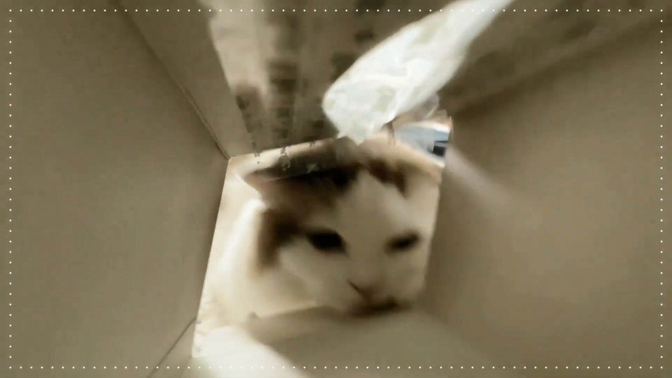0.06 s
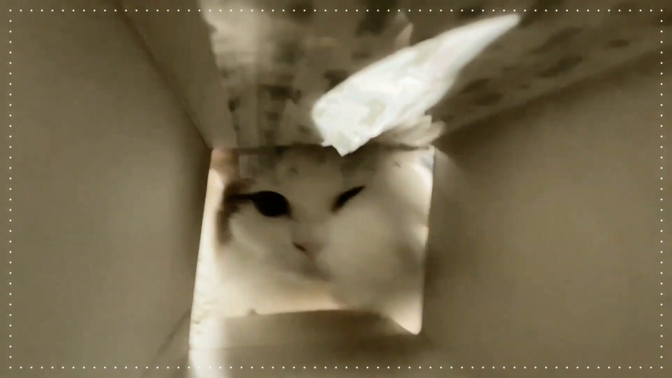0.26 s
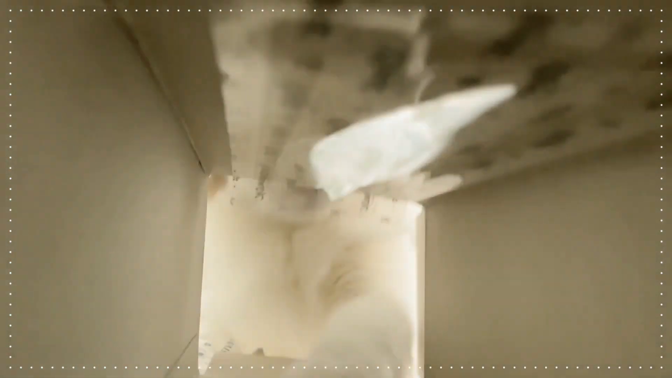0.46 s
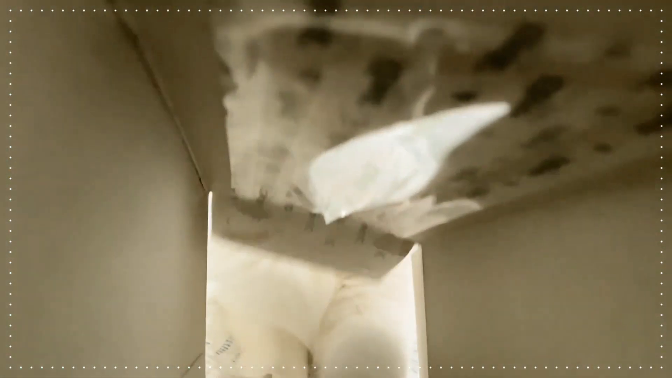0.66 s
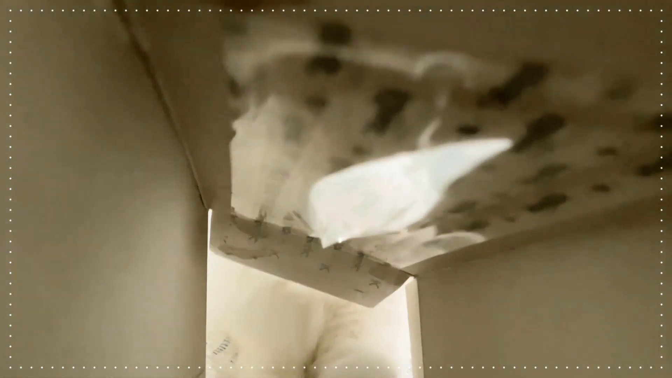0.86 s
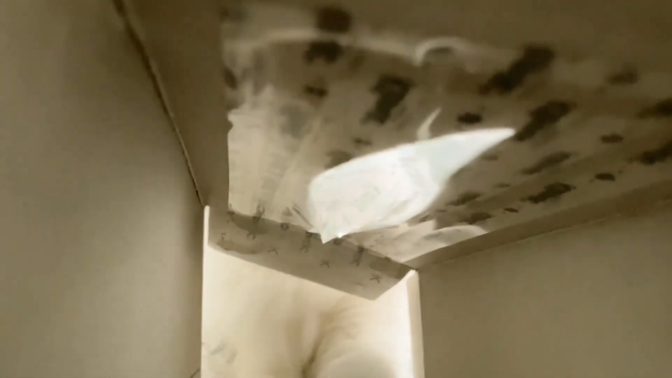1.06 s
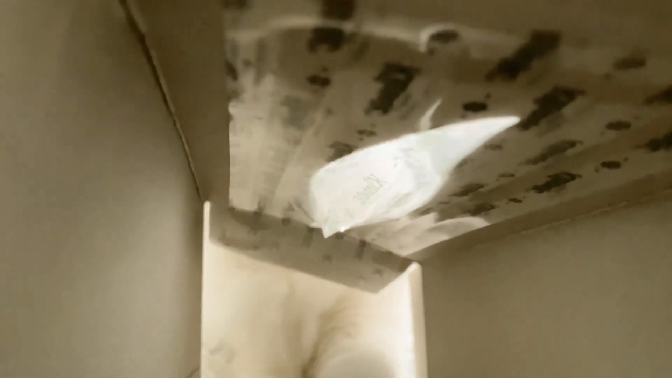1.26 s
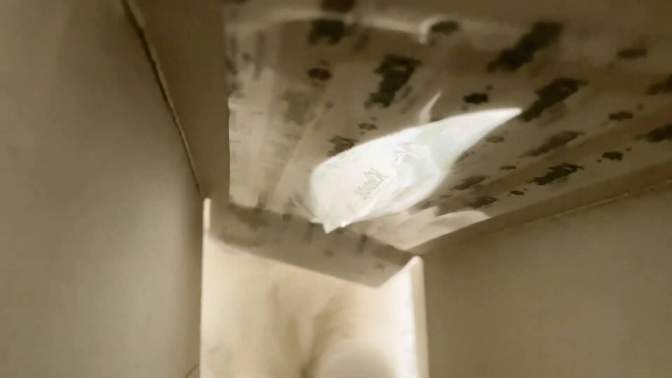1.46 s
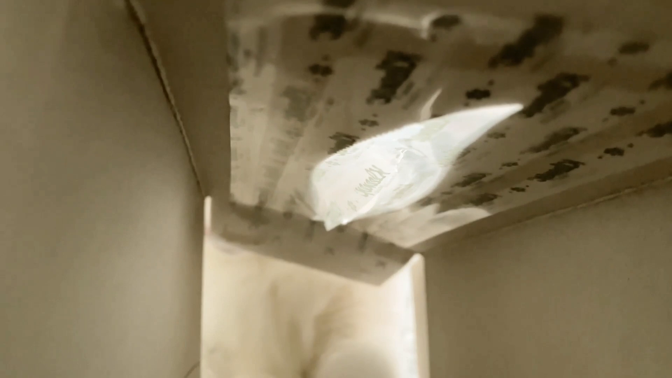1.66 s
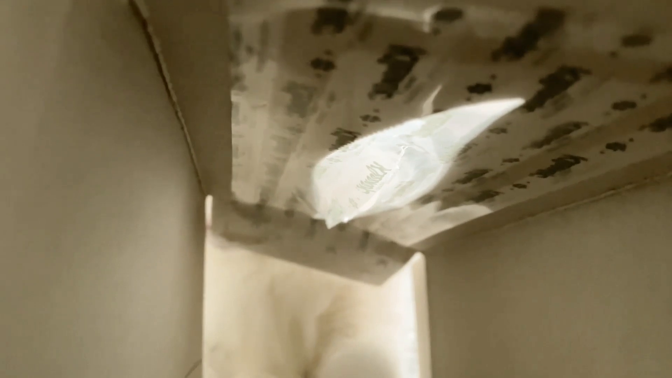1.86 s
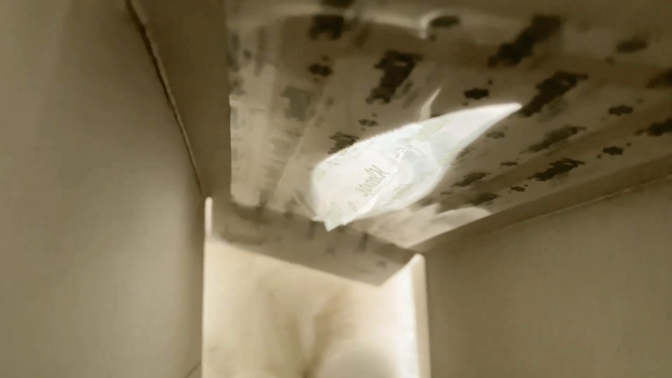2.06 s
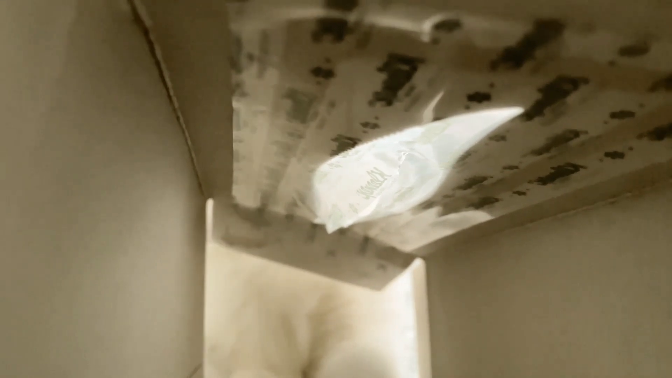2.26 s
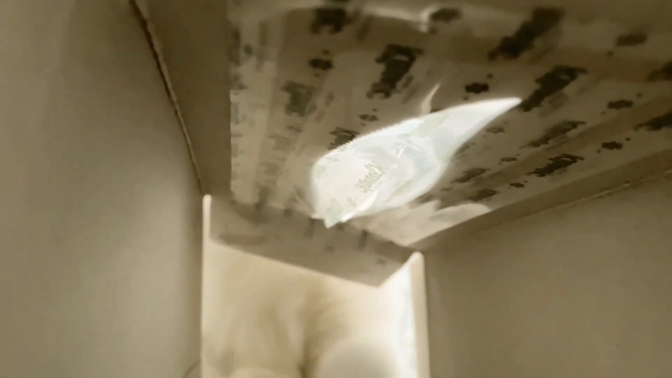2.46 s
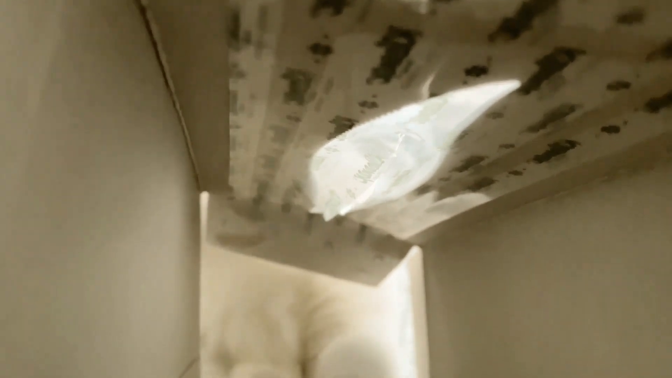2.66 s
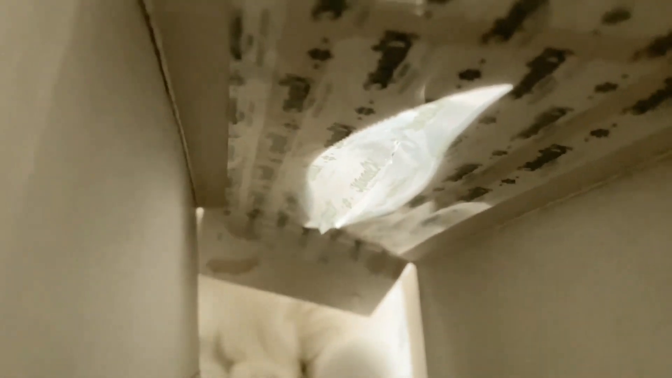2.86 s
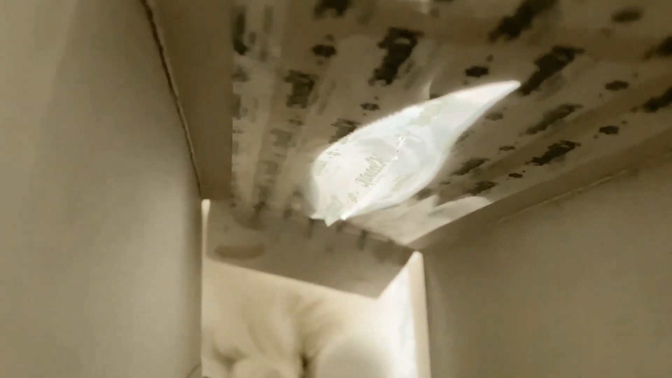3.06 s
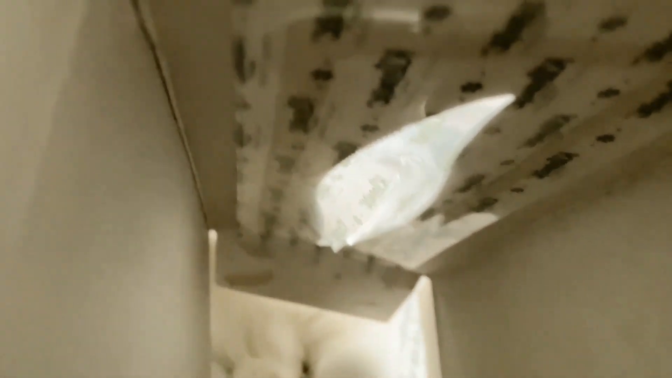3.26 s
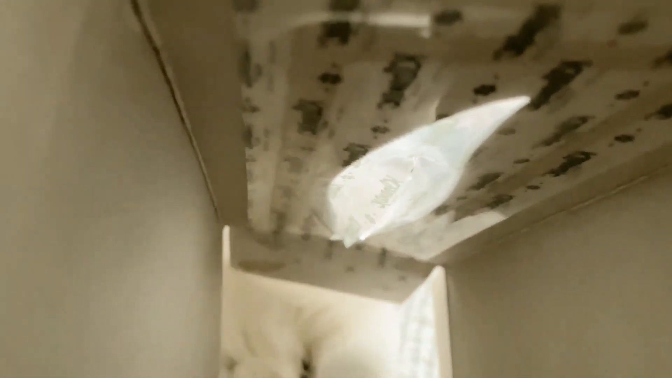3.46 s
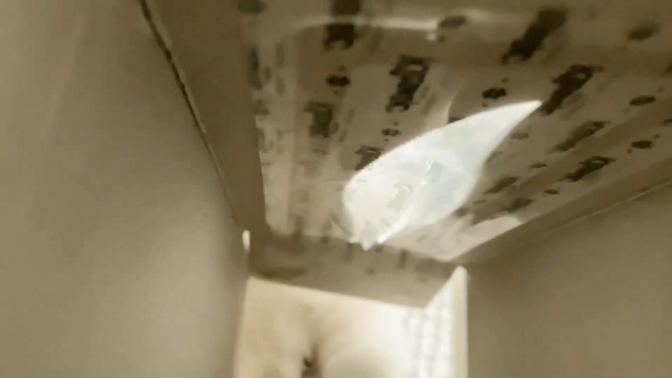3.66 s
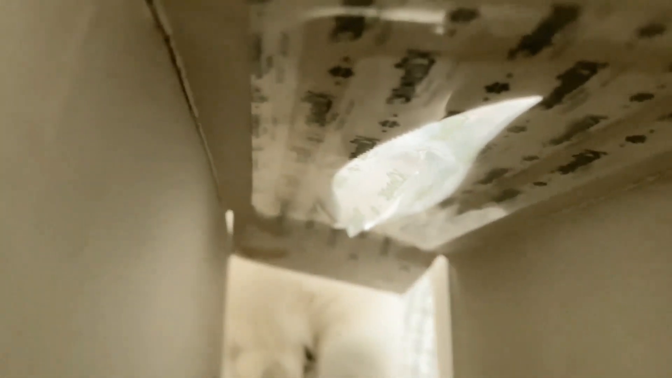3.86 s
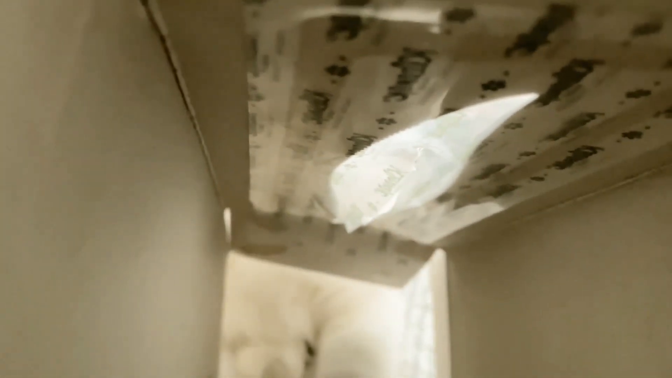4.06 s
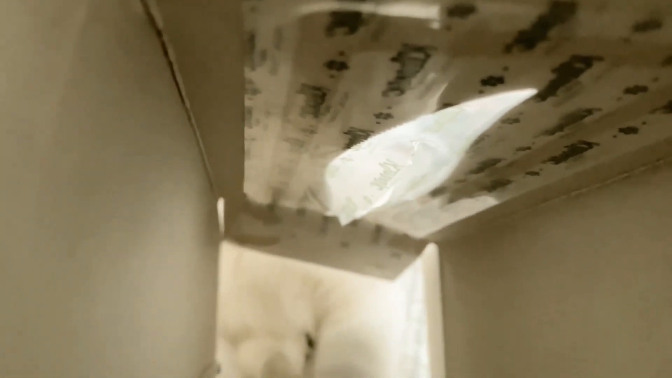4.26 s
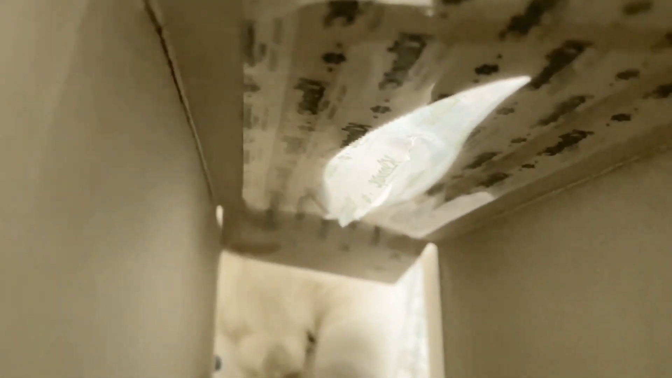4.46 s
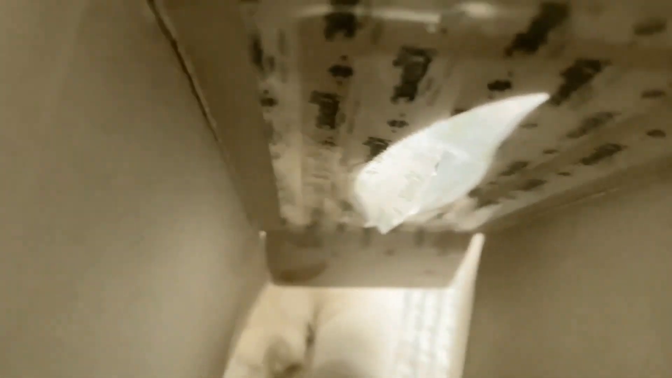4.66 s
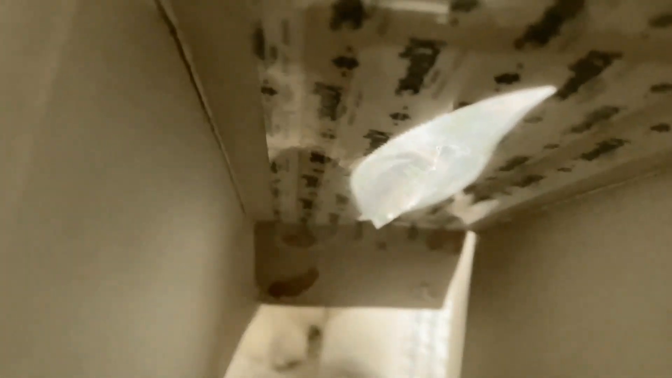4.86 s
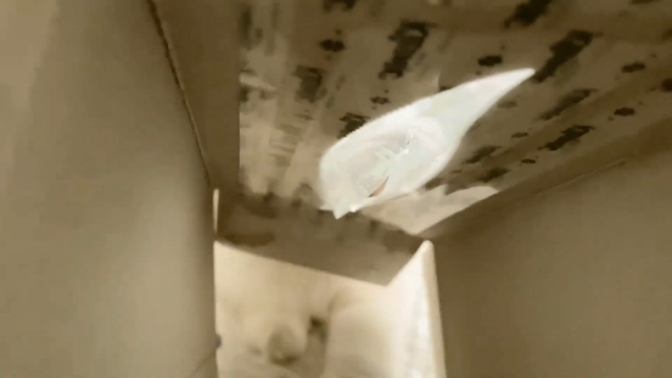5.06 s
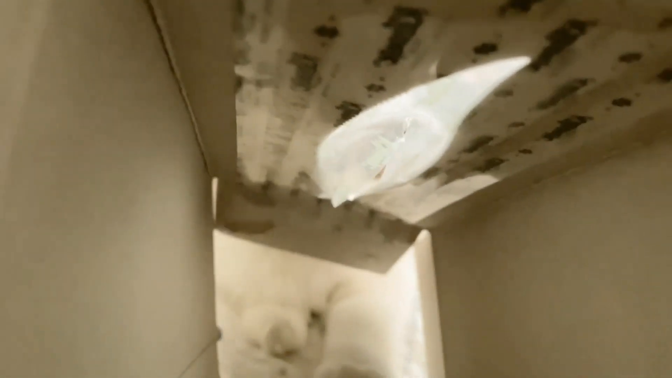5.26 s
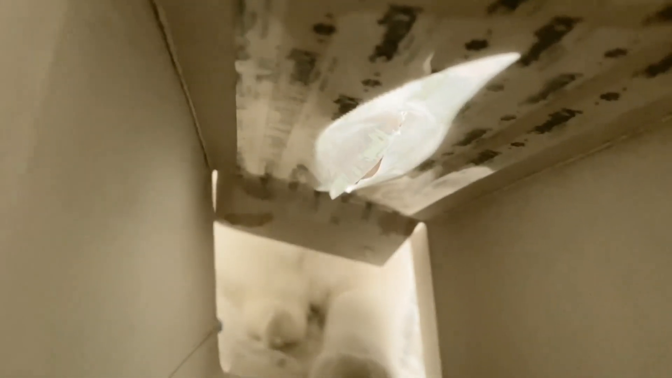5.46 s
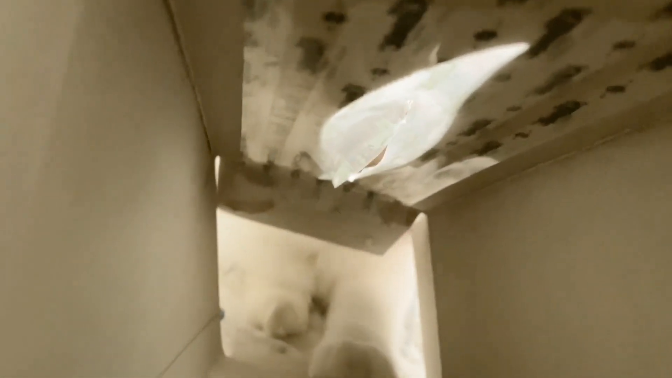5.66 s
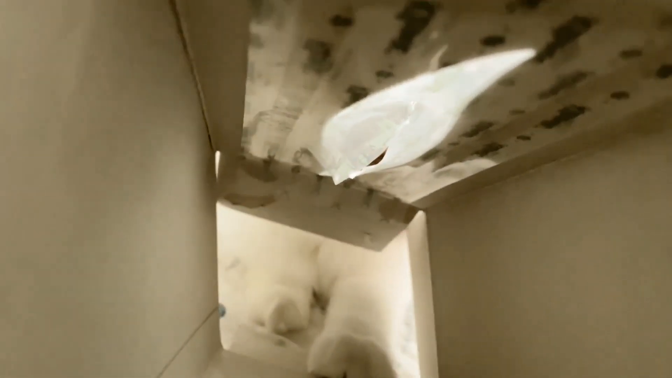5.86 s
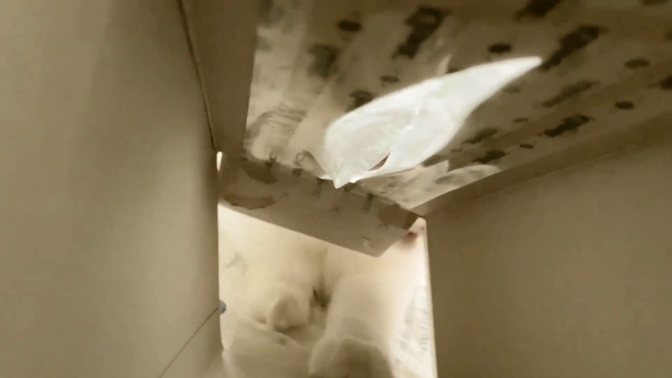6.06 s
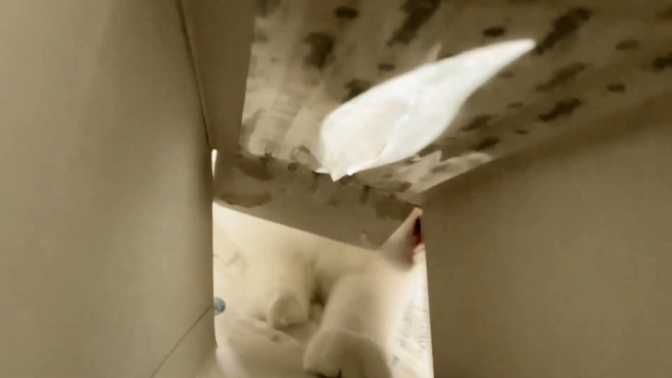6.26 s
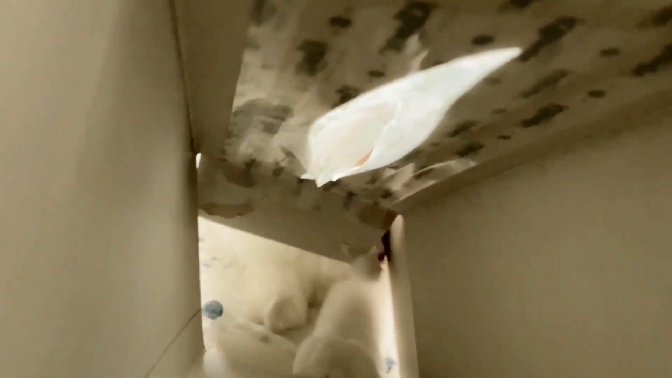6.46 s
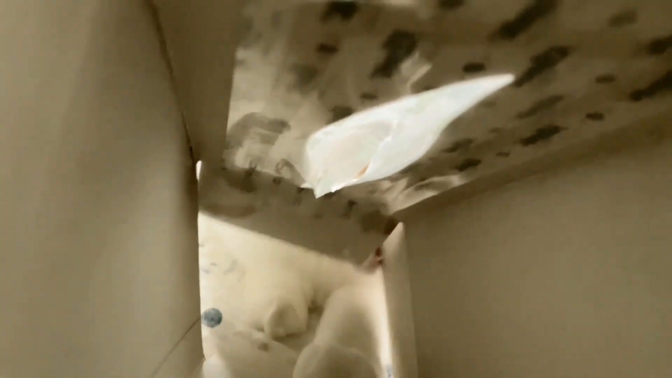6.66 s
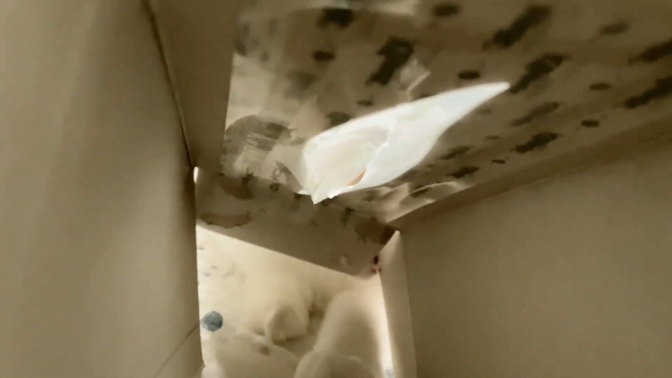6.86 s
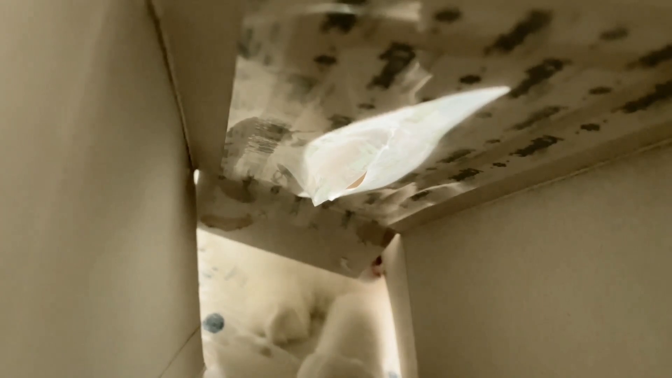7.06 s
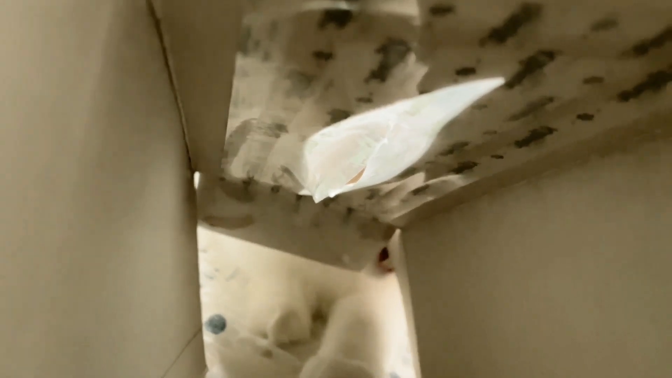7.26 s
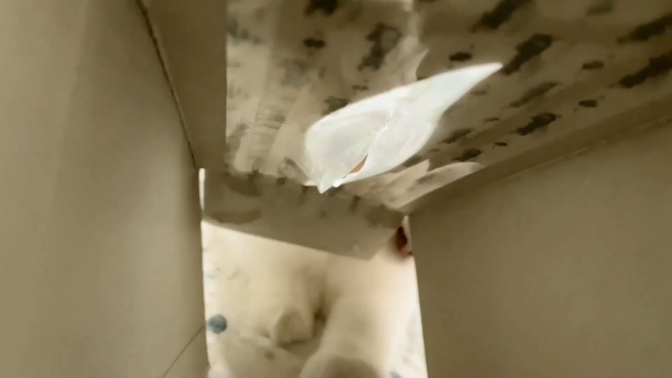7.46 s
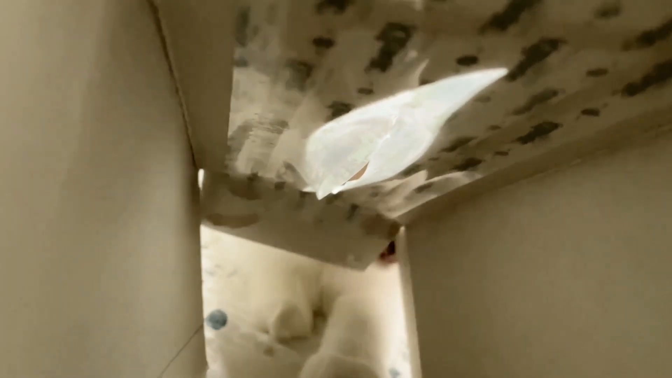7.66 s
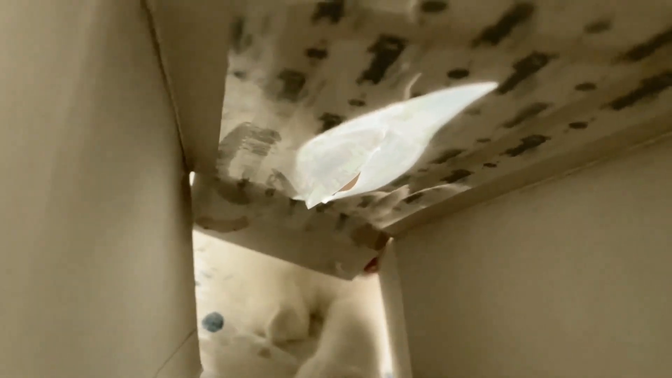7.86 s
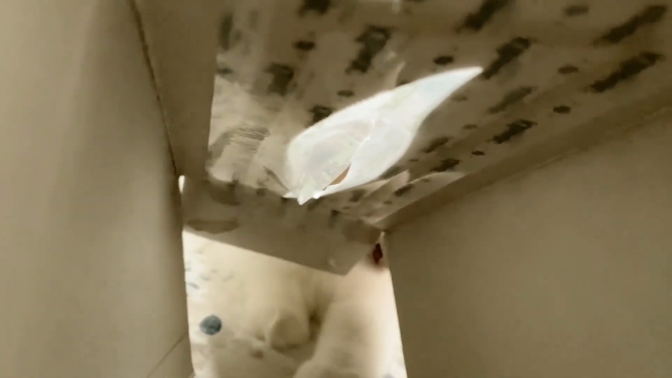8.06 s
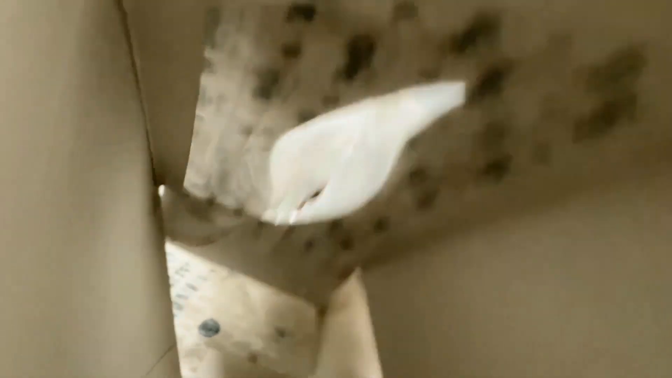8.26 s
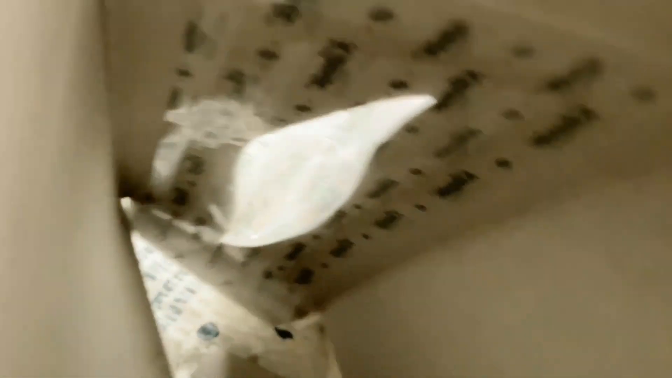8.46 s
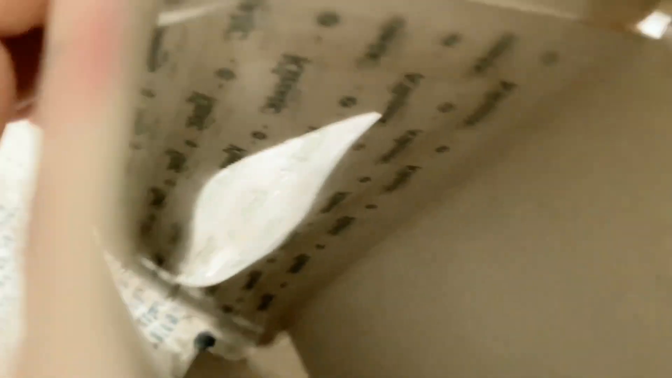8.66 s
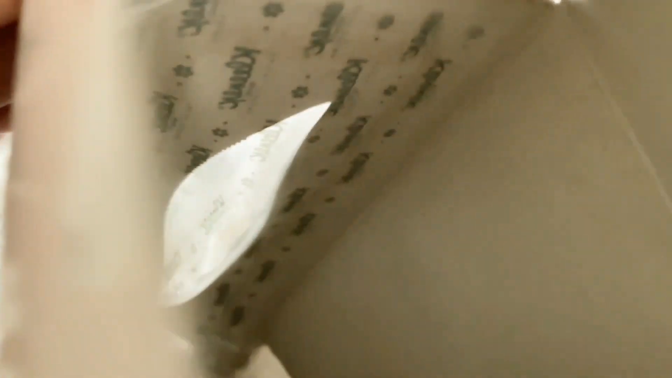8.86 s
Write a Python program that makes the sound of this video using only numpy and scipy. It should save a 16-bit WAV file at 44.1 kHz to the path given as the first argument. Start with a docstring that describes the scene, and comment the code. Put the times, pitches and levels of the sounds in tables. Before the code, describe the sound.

Soft paw thumps and irregular claw knocks on hollow cardboard, with long quiet gaps, faint scratching and crackling, then one hard boomy blow near the end.

```python
"""A cat paws at the opening of a cardboard box, heard from inside it.
Paws set damped panels swinging; claw taps excite board modes; heavy blows send bending waves through a wall.
Dragged claws, fur and chafing board are filtered friction noise; crinkles and picking are short noise bursts.
Low noise rumbles as the box shifts, a run of sniffs passes as air puffs, and the room hushes faintly.
Diffuse echoes and unequal microphone ports make the hollow, with the mid range leaning left."""
import sys
import numpy as np
from scipy import signal
from scipy.fft import rfft, irfft, next_fast_len
from scipy.io import wavfile
from scipy.ndimage import uniform_filter1d, map_coordinates

SR = 44100
rng = np.random.default_rng(int(sys.argv[2]) if len(sys.argv) > 2 else 0)


def store_wav(level_fs):
    """Save 16-bit WAV to argv[1]."""
    pcm = np.round(np.clip(np.atleast_2d(level_fs), -1, 1) * 32767)
    wavfile.write(sys.argv[1], SR, pcm.T.astype(np.int16))


N = 392931  # samples

# Event levels are relative: the sources add trims to them.
# claws and flap striking the board: start_s, crack_db, knock_db, clack_db, snap_db, spot_hz
TAP_EVENTS = [(0.063, -47.5, -45, -69, -51, 450), (0.126, -54, -48, -59, -59, 566),
              (0.297, -46.5, -45.5, -58.5, -43.5, 664), (0.314, -55.5, -47, -56, -58, 307),
              (0.367, -57.5, -52.5, -52, -52, 533), (0.4665, -27, -30.5, -32, -41, 416),
              (0.4777, -55.5, -31, -38, -57, 992), (0.5015, -52.5, -33.5, -51.5, -55, 765),
              (2.897, -54, -56.5, -50, -72, 520), (3.48, -58, -67, -58, -56.5, 650),
              (3.6432, -28, -37, -27, -41, 522), (3.6575, -60, -34.5, -57.5, -62, 641),
              (3.6828, -63, -45, -56, -56, 598), (4.738, -50.5, -43.5, -55, -63, 692),
              (5.0109, -41.5, -44.5, -31.5, -48, 645), (5.0759, -47, -38.5, -34, -51, 665),
              (5.499, -65.5, -50.5, -73, -73, 400), (5.9136, -50, -51.5, -52.5, -44, 694),
              (6.295, -34.5, -35.5, -34.5, -35.5, 698), (6.3242, -42, -39.5, -40, -50, 802),
              (6.3513, -36, -38.5, -41.5, -43, 567), (6.449, -55, -53, -47.5, -67, 720),
              (6.71, -48, -46.5, -51, -52, 640), (6.723, -39.5, -38, -61, -39, 324),
              (6.954, -42, -43.5, -47, -36.5, 350), (7.164, -49, -49.5, -68, -41, 674),
              (7.332, -53, -54, -73, -44.5, 646), (7.378, -67, -52, -75, -62, 520),
              (7.4934, -60, -46.5, -62, -70, 566), (7.735, -58, -49.5, -70, -63, 658),
              (8.153, -49, -62, -68, -37, 602), (8.482, -22.5, -23.5, -29.5, -36, 644),
              (8.8327, -45, -59, -68, -57, 614)]
# paws pushing a panel: start_s, level_db, settled pitch_hz, push_s
THUMP_EVENTS = [(0.049, -33, 150, 0.0068), (.057, -29, 85.1, .006), (.088, -30.5, 72, 0.0067),
                (.176, -31, 57.4, .006), (0.264, -31, 77, .006), (.303, -30, 85.9, .006),
                (.364, -32.5, 59.2, .006), (0.468, -21.5, 238.3, 0.007), (.472, -20.5, 80, 0.0036),
                (.496, -26.5, 79.7, 0.0054), (.66, -25, 78.1, 0.011), (.69, -31, 88.5, .006),
                (2.949, -41, 86.3, 0.0066), (2.954, -36, 150, 0.0045), (3.307, -36.5, 122, .006),
                (3.648, -24.5, 157.6, .006), (3.666, -23.5, 75.5, .006), (4.245, -43, 73.5, 0.0052),
                (4.749, -38, 151.4, 0.0077), (4.8, -43, 87, 0.0078), (4.811, -34.5, 241, 0.0088),
                (5.027, -30.5, 174.3, 0.013), (5.077, -23.5, 109.6, 0.0044), (5.152, -28, 57, .012),
                (5.5, -41, 132, 0.0045), (5.938, -40.5, 69, .012), (6.271, -27.5, 204.4, .017),
                (6.302, -19.5, 183, .01), (6.361, -22.5, 197.6, .008), (6.467, -40.5, 168.4, 0.0091),
                (6.735, -29.5, 191, 0.0048), (6.962, -27, 170, .006), (7.159, -41, 176, 0.011),
                (7.193, -41, 96.6, 0.0066), (7.28, -38, 168.5, 0.0045), (7.366, -43, 192, 0.0075),
                (7.493, -39, 114, .008), (7.629, -40.5, 157.6, .014), (7.735, -38, 178, 0.019),
                (8.408, -37.5, 161, 0.0066), (8.496, -24.5, 64, 0.0064), (8.886, -35, 168.2, 0.013)]
# heavy blows bending a wall: start_s, wave_db, first_hz, sweep_s (pitch halves), wave_t60_s,
# boom_db, boom_hz, boom_t60_s
BLOW_EVENTS = [(.468, -21.5, 750, 0.0043, 0.068, -28, 399, 0.15),
               (6.299, -28, 844, 0.021, .025, -47.5, 700, .15), (8.482, -16, 900, .008, .04, -28, 471, .13)]
# claws dragged over the board: start_s, length_s, rasp_db, hiss_db, mean slips_per_s
SCRAPE_EVENTS = [(0.162, 0.039, -54.5, -57, 710), (0.252, 0.055, -59, -60.5, 500),
                 (0.467, 0.09, -46, -52, 1100), (2.183, 0.042, -68, -68.5, 1200),
                 (4.784, 0.093, -35, -46.5, 950), (4.84, 0.087, -53, -62, 1400),
                 (6.321, .075, -50.5, -75, 1100), (6.946, 0.029, -52, -49, 1060),
                 (7.35, 0.032, -60.5, -87, 600)]
# board chafing on board until it lets go: start_s, length_s, level_db, resonance_hz
CHAFE_EVENTS = [(.57, 0.204, -64.5, 1440), (.76, 0.2076, -61, 1800), (2.523, 0.12, -75, 1944),
                (2.67, 0.16, -64, 1900), (2.868, 0.078, -56.5, 1880), (3.257, .11, -62.5, 2150),
                (3.565, 0.088, -68.5, 1950), (8.236, 0.067, -61, 2450), (8.324, 0.069, -45.5, 2100),
                (8.516, .025, -48, 2470), (8.55, .02, -46, 2640), (8.829, .005, -47, 3600)]
# a paw or flank sliding over the board: start_s, length_s, pad_db, claw_db, fur_db
STROKE_EVENTS = [(0.02, 0.42, -62, -68.5, -66.5), (0.5, .2, -51.5, -57, -60.5),
                 (0.7, 0.11, -54, -64.5, -67), (0.86, 0.11, -53, -68, -73.5), (2.13, 0.1, -70.5, -86, -82),
                 (2.29, 0.077, -69.5, -83.5, -84.5), (2.54, 0.32, -65, -88, -79.5),
                 (2.8, 0.19, -60, -67.5, -69.5), (2.99, 0.46, -66, -73, -68),
                 (3.25, 0.14, -54, -56.5, -67.5), (3.43, 0.12, -74, -79, -75),
                 (3.62, 0.089, -62, -62.5, -62.5), (3.835, 0.14, -64, -73.5, -69.5),
                 (4.0, 0.16, -74, -77.5, -65.5), (4.15, 0.094, -64.5, -72, -65.5),
                 (4.41, 0.15, -69.5, -72, -66), (4.56, 0.11, -63.5, -60.5, -66.5),
                 (4.72, 0.18, -53, -64.5, -61), (4.965, 0.018, -64, -67, -73),
                 (5.01, 0.13, -49, -56, -56.5), (5.35, 0.32, -63, -76, -81),
                 (5.69, 0.15, -75.5, -78, -76.5), (6.135, 0.34, -63, -64, -66),
                 (6.49, .16, -56, -62, -63.5), (6.78, 0.028, -58.5, -65, -65),
                 (6.92, 0.025, -61, -68.5, -69), (7.1, 0.24, -65.5, -72.5, -64.5),
                 (7.35, 0.3, -65, -75, -74), (7.72, 0.19, -62, -70, -73.5), (8.0, 0.14, -58.5, -63, -64),
                 (8.24, 0.023, -61, -61.5, -63), (8.33, 0.084, -51.5, -52.5, -56.5),
                 (8.51, 0.068, -50, -50.5, -55.5), (8.62, 0.57, -56.5, -57.5, -62)]
# the cat only leaning on the board: pad_db, claw_db, fur_db
RESTING_LEVELS = (-83, -93, -89.5)
# claws picking at the flap: start_s, length_s, crackle_db
PICKING_EVENTS = [(7.08, 0.24, -64), (7.42, 1.2, -67.5), (8.52, 0.38, -65)]
# the creased flap crinkling under a claw: start_s, level_db
CRINKLE_EVENTS = [(7.083, -54), (7.102, -57), (7.125, -52.5), (7.143, -49.5), (7.178, -47), (7.202, -50),
                  (7.238, -48.5), (7.346, -52.5), (7.778, -55), (7.787, -56), (7.845, -51), (8.243, -54.5),
                  (8.292, -52.5), (8.556, -53), (8.672, -52.5), (8.712, -59), (8.893, -50)]
# the cat sniffing in a quick run: centre_s, level_db
SNIFF_EVENTS = [(1.069, -68), (1.175, -63.5), (1.288, -61), (1.399, -64.5), (1.511, -66), (1.72, -69.5)]
# the box shifting on its base: time_s, rumble_db
SHIFT_CURVE = [(0.0, -60), (0.3, -47), (0.74, -55), (1.05, -63.5), (1.85, -68.5), (2.6, -63), (3.2, -56),
               (3.55, -60), (3.95, -60.5), (4.4, -71.5), (5.05, -57), (5.5, -60), (5.8, -74.5), (6.3, -61),
               (6.85, -61), (7.45, -51), (7.8, -52), (8.25, -70.5), (8.55, -51.5), (8.9, -54.5)]
# sliding turns jerky as claws work at the flap: time_s, pressure swing_db per unit of wobble
GRIP_CURVE = [(.4, 1), (.6, 1.3), (2.5, 1), (6.9, 2.5), (7.1, 5), (7.5, 2.5)]

# modes of the flap and the air in the box: mode_hz, level_db, share of the flap's ring time (ratio)
BOARD_MODES = [(256, -6.5, 0.57), (407, -8, 1.3), (508, -2.5, 1.2), (607, 2, 1.4), (728, 2, 0.52),
               (863, -2, 0.79), (1083, 6, 0.28), (1310, -6, 0.18), (1471, -4.5, 0.8), (1980, -4.5, 0.85),
               (2560, -8.5, 0.6)]
# a claw snapping free of the edge: mode_hz, level_db, t60_s
CLAW_MODES = [(4530, -14.5, 0.016), (6270, -12, 0.018), (7360, 0.5, 0.0053), (10460, 3, 0.0087),
              (11900, -7, 0.018), (13370, 4, 0.011)]
# standing waves between the walls that colour a scratch: mode_hz, width_hz, level_db
CAVITY_MODES = [(1870, 94, -1), (2460, 66, -2), (3460, 45, -11.5), (3950, 200, -12), (4750, 50, -12.5)]
# boom of a struck wall: multiple of boom pitch (ratio), level_db
BOOM_SPECTRUM = [(.25, -11.5), (.8, 1.5), (1.5, -2), (2.4, -11.5), (8, -69)]

# pads rubbing board: frequency_hz, level_db (per Hz)
RUBBING_SPECTRUM = [(120, -21), (200, -1), (285, -10.5), (318, -7.5), (386, -12), (449, -7.5), (514, -13),
                    (603, -6.5), (882, -15.5), (1500, -23), (1950, -43), (3300, -120)]
# fur, and the hiss of a scrape: frequency_hz, level_db (per Hz)
FUR_SPECTRUM = [(2500, -10), (5000, -12), (7300, -3.5), (8700, -6), (10000, -2.5), (13000, -3),
                (16000, -16)]
# scraped board and tap clatter: frequency_hz, level_db (per Hz)
RASP_SPECTRUM = [(180, -30), (350, -11), (490, -18), (615, 2.5), (780, -2), (900, -9), (1080, -5),
                 (1550, -14), (1980, -9.5), (2300, -17.5), (2560, -15), (2950, -27.5), (4200, -23),
                 (7000, -35.5)]
# box shifting on its base: frequency_hz, level_db (per Hz)
RUMBLE_SPECTRUM = [(15, -50.5), (25, -17.5), (52, 6.5), (75, 6), (200, -6), (281, -14), (318, -10),
                   (384, -17.5), (500, -26), (650, -34.5), (1100, -120)]
# crushed paper skin: frequency_hz, level_db (per Hz)
CRACK_SPECTRUM = [(600, -26), (2000, -2.5), (2800, -3), (4600, -4.5), (5800, -15), (7400, -8.5),
                  (12000, -32.5)]
# bright edge of a tap: frequency_hz, level_db (per Hz)
SNAP_SPECTRUM = [(4000, -19.5), (8700, -5), (10400, -5.5), (13300, -5.5), (16000, -19)]
# claws sliding on board: frequency_hz, level_db (per Hz)
SCRATCH_SPECTRUM = [(900, -9.5), (1500, 1.5), (1720, -1), (2000, 1), (2550, -4), (3200, -6.5), (4100, -5.5),
                    (4900, -4.5), (5800, -20), (7500, -33)]
# creased flap: frequency_hz, level_db (per Hz)
CRINKLE_SPECTRUM = [(200, -8), (650, 13), (1100, -16), (2200, 1), (3200, -4), (4800, -6), (8700, -4.5),
                    (12500, -2), (16000, -13)]
# chafing board, before its resonance: frequency_hz, level_db (per Hz)
CHAFE_SPECTRUM = [(500, -20), (1000, 4.5), (1400, -2), (2050, -1), (2550, 0), (3000, -13.5), (4600, -8.5),
                  (6000, -21.5), (9000, -45.5)]

# level difference of the two microphone ports: frequency_hz, left_over_right_db
PORT_LEAN = [(120, -.7), (250, 2.5), (550, 7.5), (800, 10.5), (1150, 13.5), (2000, 7.5), (4000, 4.5),
             (8000, 0), (16000, .4)]
# phase difference of the two ports: frequency_hz, left_lead_rad
PORT_LEAD = [(60, 0.27), (250, 0.48), (750, 1.1), (1150, 0.5), (2000, 0.6), (3200, 1.36), (5500, 0.99),
             (8500, 2.72), (10500, 1.88), (13000, 1.2), (16000, 0.6)]

TOP_HZ = 16200  # upper band limit
BOARD_RING_S = 0.04  # t60 of the flap
PANEL_RING_S, PANEL_HZ, PANEL_DAMPING = 0.12, 122, 0.68  # t60 at that pitch; power law of its fall with pitch
SPOT_DB, SPOT_RING_S = 1.5, 0.072  # ring of the struck spot over the knock level; its t60
SWELL_DB_PER_S, FADE_DB_PER_S, ARCH_DB = 218.5, 329, 3  # stroke onset, release, and drop from middle to ends
CHAFE_RISE_DB, CHAFE_ATTACK_S, CHAFE_RELEASE_S = 5, 0.0068, .01  # growth over one chafe; its start and stop
CHAFE_RING_DB, CHAFE_WIDTH_HZ = 6.5, 230  # the resonance of the chafing edge


def amp(db):
    """Logarithmic level: decibels become an amplitude ratio."""
    return 10 ** (np.asarray(db) / 20)


def unit(x):
    """Normalisation: scale to an rms of 1."""
    return x / np.sqrt(np.mean(x ** 2) + 1e-20)


def along(points, hz):
    """Log-frequency interpolation between (frequency, value) points."""
    f, v = np.transpose(points)
    return np.interp(np.log(hz + 1), np.log(f + 1), v)


def curve(rows):
    """Linear interpolation of (time, value) points, one value per sample."""
    s, values = np.transpose(rows)
    return np.interp(np.arange(N) / SR, s, values)


def wobble(rate):
    """Slow random modulation: a smooth curve through rate random knots a second."""
    knots = rng.standard_normal(int(N * rate / SR) + 4)
    return map_coordinates(knots, [np.arange(N) * rate / SR])


def filtered(x, response):
    """Linear filtering: the spectrum is multiplied by a complex response."""
    n = x.shape[-1]
    m = next_fast_len(n + SR // 8)
    return irfft(rfft(x, m) * response(np.fft.rfftfreq(m, 1 / SR)), m)[..., :n]


def coloured(x, spectrum):
    """Spectral shaping by a gain curve, at rms 1."""
    return unit(filtered(x, lambda hz: amp(along(spectrum, hz))))


def noise(n):
    """White noise: independent normal samples."""
    return rng.standard_normal(n)


def add(track, s, sound):
    """Superposition: mix a sound in at time s."""
    part = track[max(round(s * SR), 0):][:len(sound)]
    part += sound[:len(part)]


def resonances(hz, modes):
    """Modal response: a sum of damped resonances given as (mode_hz, width_hz, level_db)."""
    return sum(amp(db) / (1 + 2j * (hz - mode) / width) for mode, width, db in modes)


def fibres(n, rate, spread_db, smooth):
    """Friction as random impulses: fibres catch and let go in uneven clicks over a smooth hiss."""
    sizes = noise(n) * amp(spread_db * noise(n))
    clicks = (rng.random(n) < rate / SR) * sizes
    return unit(clicks) + smooth * noise(n)


def strokes(rows):
    """Gesture envelope per level column: each stroke swells, peaks midway and fades; powers add."""
    t = np.arange(N) / SR
    power = np.zeros((len(rows[0][2:]), N))
    for start, length, *levels in rows:
        near = slice(max(int((start - .5) * SR), 0), int((start + length + .5) * SR))
        u = t[near] - start
        arch_db = -ARCH_DB * np.clip(2 * u / length - 1, -1, 1) ** 2
        swell_db = -SWELL_DB_PER_S * np.maximum(-u, 0)
        fade_db = -FADE_DB_PER_S * np.maximum(u - length, 0)
        power[:, near] += np.outer(amp(levels), amp(arch_db + swell_db + fade_db)) ** 2
    return np.sqrt(power)


def room_floor():
    """Stationary noise: the faint hush of the room, shaped by a fixed spectrum."""
    hush = [(25, -6.5), (70, 5.5), (300, -9.5), (700, -6.0), (2500, -36.0), (8000, -48.0), (13000, -26.5)]
    return amp(-79.0) * coloured(noise((2, N)), hush)


def hollow(x, t60=0.17):
    """Diffuse reverberation: decaying random echoes of box and room, different at each port."""
    t = np.arange(SR // 4) / SR
    tail = noise((2, len(t))) * amp(-60 * t / t60) * (1 - np.exp(-t / 0.0022))
    wet = signal.fftconvolve(x[None], tail / np.linalg.norm(tail[0]), axes=1)[:, :N]
    tone = [(100, -15.0), (600, 3.5), (3000, -2.0), (12000, -19.5)]
    return filtered(wet, lambda hz: amp(along(tone, hz)))


def ports(x):
    """Interaural-style cues: standing waves reach two ports with different strength and phase."""
    def response(hz):
        half = amp(along(PORT_LEAN, hz) / 2) * np.exp(1j * along(PORT_LEAD, hz) / 2)
        pair = np.array([half, 1 / half])
        return pair / np.abs(pair).mean(axis=0)
    return filtered(x, response)


def resonant(x, peak=0.15, width_hz=65):
    """Shared modal response: friction excites the same modes as the taps do."""
    modes = [(mode, width_hz, db) for mode, db, share in BOARD_MODES]
    return filtered(x, lambda hz: 1 + peak * resonances(hz, modes))


def boxy(x, depth=0.99):
    """Cavity resonance: standing waves of the box stand out of a scratch, at rms 1."""
    return unit(filtered(x, lambda hz: 1 + depth * resonances(hz, CAVITY_MODES)))


def wandering(x, patchy_db=2.5):
    """Time-varying filtering: narrow resonances come and go as the contact moves over the board."""
    z = signal.stft(x, nperseg=1024)[2]
    field = uniform_filter1d(noise(z.shape), size=4, axis=0)  # across frequency
    field = uniform_filter1d(field, size=7, axis=1)  # across time
    return signal.istft(z * unit(amp(patchy_db * unit(field))), nperseg=1024)[1][:N]


def rumble():
    """Modulated low-frequency noise: the box shifts on its base with a swaying level."""
    sway_db = 2.2 * wobble(17)
    level = amp(curve(SHIFT_CURVE) + 2.5 + sway_db)
    return level * coloured(noise(N), RUMBLE_SPECTRUM)


def sniffs(width_s=0.017):
    """Turbulent airflow: short soft puffs of coloured noise under Gaussian envelopes."""
    t = np.arange(N) / SR
    puffs = sum(amp(db) * np.exp(-((t - s) / width_s) ** 2) for s, db in SNIFF_EVENTS)
    breath = [(200, 1.0), (550, 9.5), (1100, -6), (1600, -16.0), (2100, -12.5), (3000, -31.5), (13000, -33.0)]
    return puffs * coloured(noise(N), breath)


def rubbing():
    """Sliding friction: uneven pressure drives pads, claws and fur over the board in small jerks."""
    pad, claw, fur = np.hypot(strokes(STROKE_EVENTS), amp(RESTING_LEVELS)[:, None])
    pressure = amp(curve(GRIP_CURVE) * wobble(60) + 0.68 * wobble(16))
    body = pad * coloured(fibres(N, rate=1000, spread_db=3.0, smooth=0.99), RUBBING_SPECTRUM)
    scratch = boxy(coloured(fibres(N, rate=510, spread_db=3.0, smooth=1.0), SCRATCH_SPECTRUM))
    hiss = coloured(fibres(N, rate=2700, spread_db=1.0, smooth=0.98), FUR_SPECTRUM)
    return pressure * (body + amp(-3.5) * claw * scratch + amp(0.08) * fur * hiss)


def picking():
    """Random impulse process: fibres tear one by one in sparse dry ticks, each with a small knock."""
    effort = strokes(PICKING_EVENTS)[0]
    t = np.arange(SR // 50) / SR
    ticks = (rng.random(N) < 220 / SR) * amp(1.7 * noise(N))  # 220 a second on average
    bursts = unit(signal.fftconvolve(ticks, amp(-60 * t / 0.025))[:N])
    tone = [(200, -2.5), (650, 10.0), (1300, -21.0), (2600, -8.0),
            (6000, -16.0), (8700, -11), (12500, -8.0), (16000, -21.0)]
    return effort * coloured(bursts * noise(N), tone)


def crinkles(attack_s=0.0014, ring_s=0.026):
    """Fracture noise: each crinkle is a short decaying cluster of breaking fibres."""
    out, t = np.zeros(N), np.arange(SR // 20) / SR
    for s, db in CRINKLE_EVENTS:
        cluster = coloured(fibres(len(t), rate=1400, spread_db=4, smooth=.6), CRINKLE_SPECTRUM)
        add(out, s, amp(db + 7 - 60 * t / ring_s) * (1 - np.exp(-t / attack_s)) * cluster)
    return out


def chafing():
    """Friction-driven resonance: a rasp focused on one edge mode grows with pressure and stops short."""
    out, t = np.zeros(N), np.arange(SR // 3) / SR
    for start, length, db, ring_hz in CHAFE_EVENTS:
        growth_db = CHAFE_RISE_DB * (np.clip(t / length, 0, 1) - 1.5)
        swell = np.clip(t / CHAFE_ATTACK_S, 0, 1) * amp(db + growth_db)
        effort = swell * np.exp(-np.maximum(t - length, 0) / CHAFE_RELEASE_S)
        slips = fibres(len(t), rate=990, spread_db=2.5, smooth=0.97)
        edge = [(ring_hz, CHAFE_WIDTH_HZ, CHAFE_RING_DB)]
        rasp = filtered(slips, lambda hz: amp(along(CHAFE_SPECTRUM, hz)) + resonances(hz, edge))
        add(out, start, effort * unit(rasp))
    return out * amp(1.8 * wobble(140))


def scrapes():
    """Stick-slip: a dragged claw slips unevenly, each slip a tiny burst; the stroke swells fast and eases off."""
    out, t = np.zeros(N), np.arange(SR // 7) / SR
    for s, length, rasp_db, hiss_db, rate in SCRAPE_EVENTS:
        slip_times = np.cumsum(.2 + .8 * rng.exponential(size=256)) / rate
        sizes = amp(rng.normal(0, 1.9, size=256))
        slips = np.bincount((slip_times * SR).astype(int), sizes, len(t))[:len(t)]
        bursts = signal.fftconvolve(slips, amp(-60 * t / 0.008))[:len(t)]
        drive = unit(bursts) * noise(len(t))
        stroke = np.abs(np.sin(np.pi * np.clip(t / length, 0, 1) ** 0.61))
        rasp = amp(rasp_db) * coloured(drive, RASP_SPECTRUM)
        hiss = amp(hiss_db) * coloured(drive, FUR_SPECTRUM)
        add(out, s, stroke * (rasp + hiss))
    return out


def claw_snap(s, db):
    """Sudden release: a claw comes free with one hard, bright click of damped modes and noise."""
    out, t = np.zeros(N), np.arange(SR // 8) / SR
    ring = sum(amp(level - 60 * t / t60) * np.sin(2 * np.pi * (hz * t + rng.random()))
               for hz, level, t60 in CLAW_MODES)
    tone = [(200, -13.0), (700, -6.5), (3000, -0.5), (8500, 2), (12000, 8.5)]
    crack = amp(-6.0 - 60 * t / 0.028) * coloured(noise(len(t)), tone)
    add(out, s, amp(db + 11.5) * (1 - np.exp(-t / 0.00052)) * (ring + crack))
    return out


def taps(clack_hz=1000):
    """Impact excitation: a contact crushes the paper skin, then rings the struck spot, flap and hollow."""
    out, t = np.zeros(N), np.arange(SR // 7) / SR
    for s, crack_db, knock_db, clack_db, snap_db, spot_hz in TAP_EVENTS:
        # a hard claw favours the upper modes, a soft pad the lower ones
        strength = [(clack_hz * 0.71, knock_db), (clack_hz * 1.5, clack_db)]
        bend = rng.normal(1, .03)  # shifts all modes together
        ring = np.zeros(len(t))
        for k, (hz, db, share) in enumerate(BOARD_MODES):
            mode_db = db + along(strength, hz) + rng.normal(0, 1)
            decay = amp(mode_db - 60 * t / (BOARD_RING_S * share))
            ring += (-1) ** k * decay * np.sin(2 * np.pi * hz * bend * t)
        spot = amp(knock_db + SPOT_DB - 60 * t / SPOT_RING_S) * np.sin(2 * np.pi * spot_hz * t)
        clatter = amp(knock_db - 10.0 - 60 * t / 0.068) * coloured(noise(len(t)), RASP_SPECTRUM)
        # the direct crack and its echoes between the walls
        burst = amp(-60 * t / 0.015) + amp(-26.0 - 60 * t / 0.17)
        crack = amp(crack_db + 2.0) * coloured(noise(len(t)), CRACK_SPECTRUM)
        snap = amp(snap_db + 3.5) * coloured(noise(len(t)), SNAP_SPECTRUM)
        crush = 1 - np.exp(-t / .0008)
        add(out, s, amp(-1.5) * ring + spot + crush * (clatter + burst * (crack + snap)))
    return out


def blows(wave_attack_s=.0007, boom_attack_s=0.0065):
    """Dispersion: high bending waves cross the wall first, so the knock sweeps down; many close modes boom."""
    out, t = np.zeros(N), np.arange(SR // 4) / SR
    for s, wave_db, first_hz, sweep_s, wave_t60, boom_db, boom_hz, boom_t60 in BLOW_EVENTS:
        turn = 2 * np.pi * np.cumsum(first_hz / (1 + t / sweep_s)) / SR
        wave = amp(wave_db - 60 * t / wave_t60) * (1 - np.exp(-t / wave_attack_s)) * np.sin(turn)
        modes = coloured(noise(len(t)), [(boom_hz * k, db) for k, db in BOOM_SPECTRUM])
        boom = amp(boom_db - 60 * t / boom_t60) * (1 - np.exp(-t / boom_attack_s)) * modes
        add(out, s, wave + boom)
    return out


def thumps(sag=.12, sag_s=.012):
    """Damped oscillation: a soft paw swings a panel, its pitch sagging as pressure eases; the board flexes."""
    out, t = np.zeros(N), np.arange(SR // 2) / SR
    flexing = [(30, -2.0), (120, 3.0), (250, 3.5), (550, -13.5), (1400, -51.5), (4000, -91.0)]
    for s, db, hz, push_s in THUMP_EVENTS:
        t60 = PANEL_RING_S * (PANEL_HZ / hz) ** PANEL_DAMPING
        turn = 2 * np.pi * hz * np.cumsum(1 + sag * np.exp(-t / sag_s)) / SR
        swing = np.sin(turn) + amp(-20.5 - 60 * t / 0.5) * np.sin(2.3 * turn)
        flex = amp(-15.5 - 60 * t / 0.35) * coloured(noise(len(t)), flexing)
        level = amp(db + 1.35 - 60 * (t - push_s) / t60) * (1 - np.exp(-(t / push_s) ** 2))
        add(out, s, level * (swing + flex))
    return out


def scene():
    """Superposition: all contacts sound through one box; some echoes reach the ports from all sides."""
    sliding = resonant(rubbing() + rumble() + picking() + crinkles())
    friction = wandering(scrapes() + chafing() + sliding)
    impacts = taps() + blows() + thumps() + claw_snap(s=7.2724, db=-28.5)
    box = impacts + friction + sniffs()
    return ports(box + amp(-15.5) * hollow(box)) + amp(-20) * hollow(box) + room_floor()


def record(dry):
    """Band limitation: a very steep low-pass removes what lies above the top frequency."""
    return filtered(dry, lambda hz: 1 / np.sqrt(1 + (hz / TOP_HZ) ** 120))


dry = scene()
out = record(dry)
store_wav(out)
```